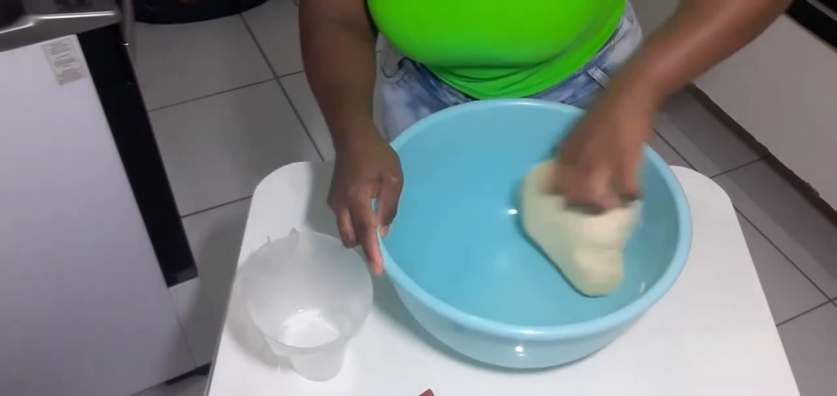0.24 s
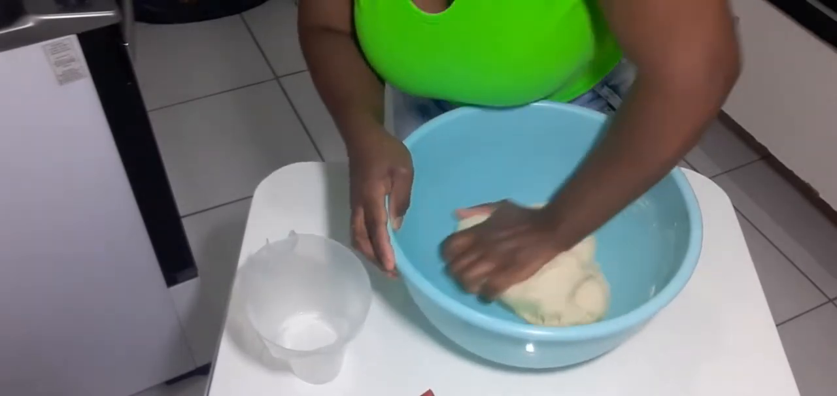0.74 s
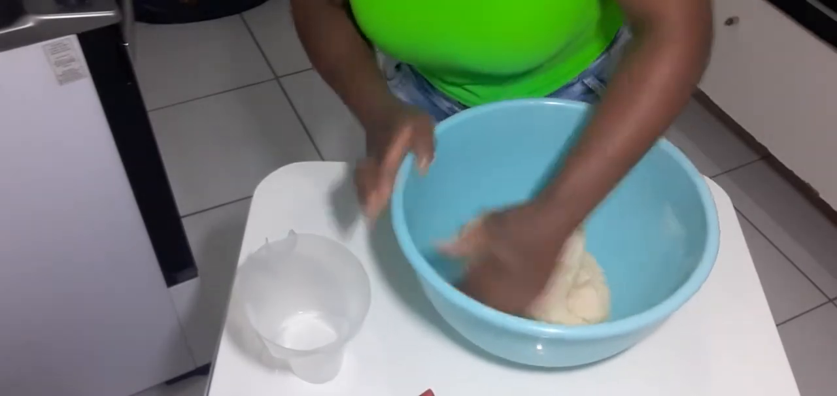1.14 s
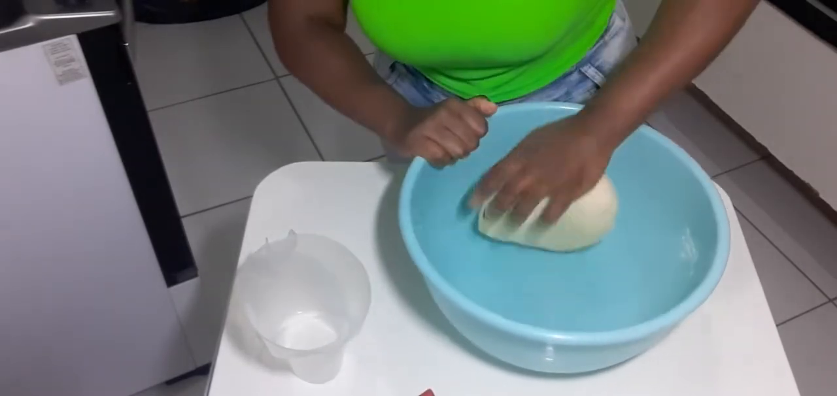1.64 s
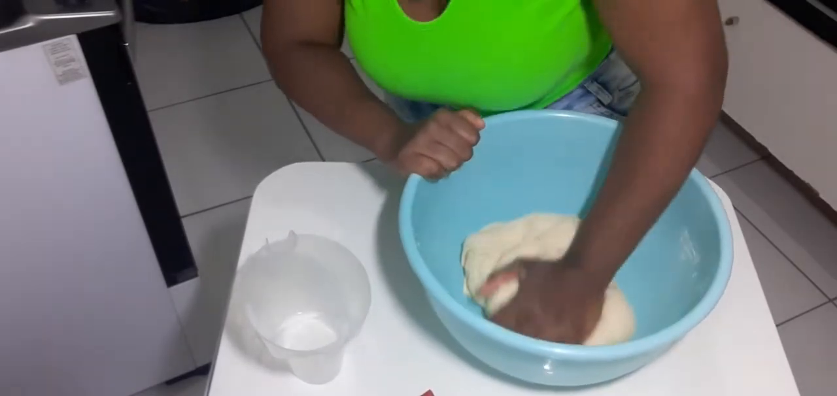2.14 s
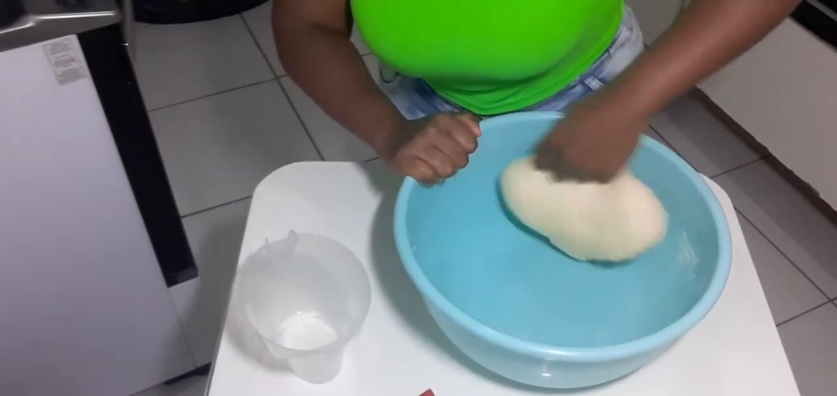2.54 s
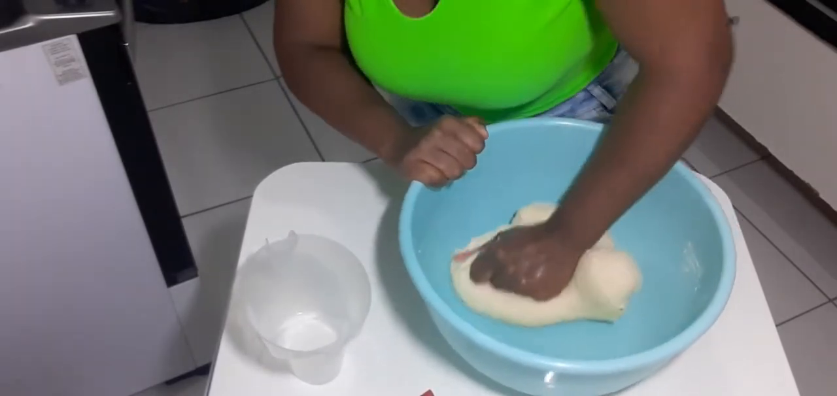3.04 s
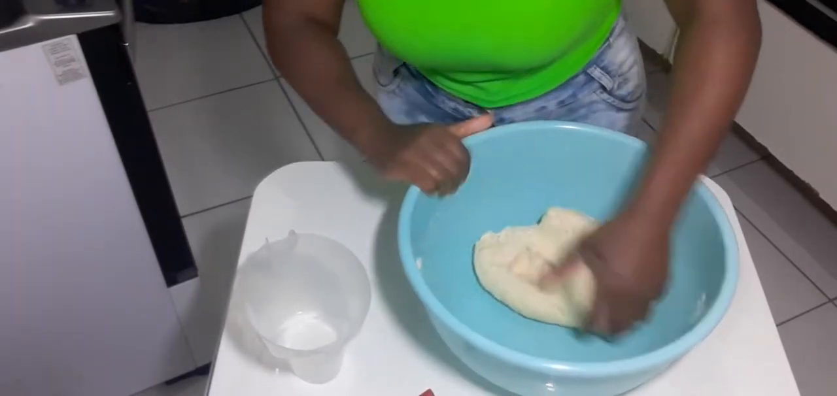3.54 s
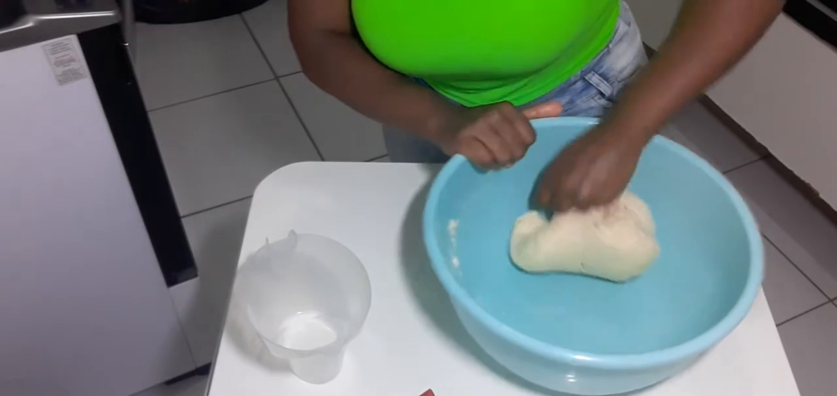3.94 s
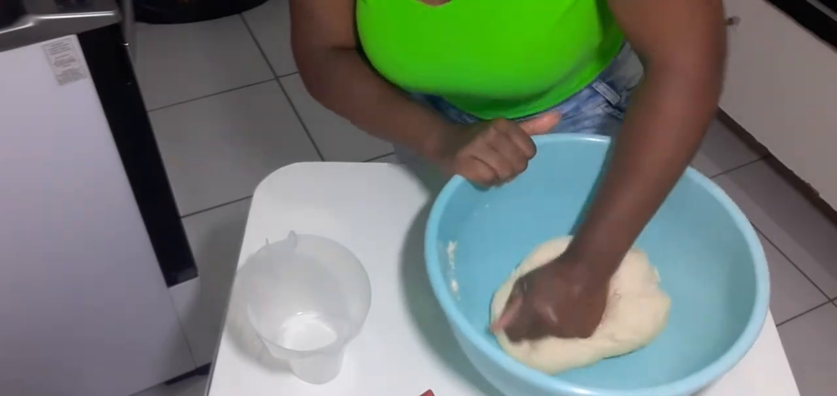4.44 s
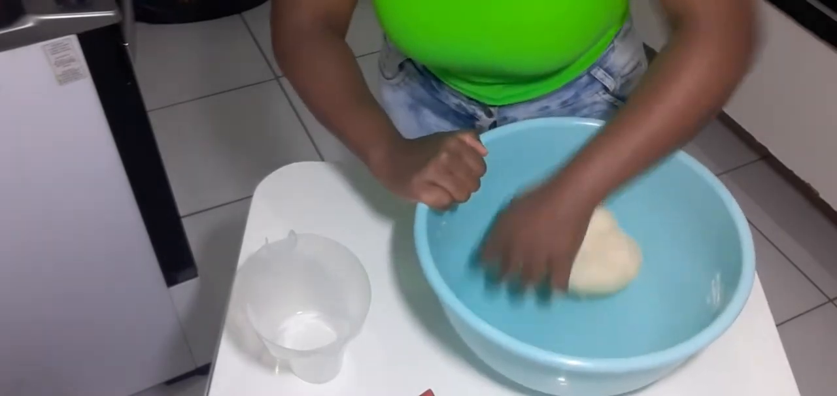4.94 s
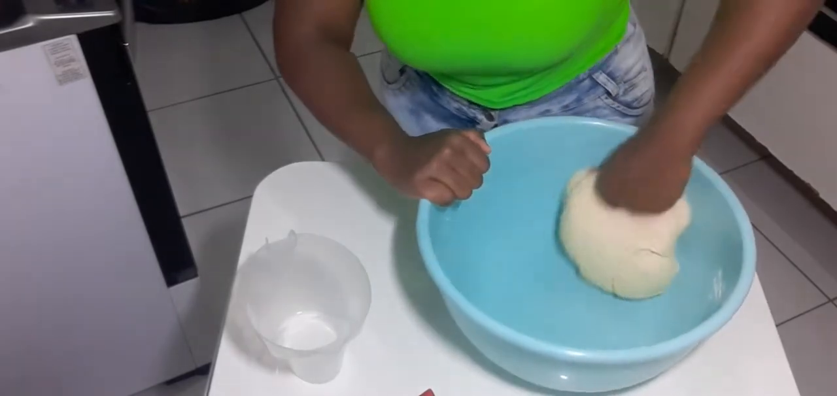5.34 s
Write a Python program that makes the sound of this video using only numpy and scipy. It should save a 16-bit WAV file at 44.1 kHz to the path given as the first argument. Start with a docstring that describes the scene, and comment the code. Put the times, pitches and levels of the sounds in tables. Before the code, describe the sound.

Dough is kneaded by hand in a plastic bowl on a table, heard fairly close and slightly right of centre in a small, hard-walled kitchen. It starts with a soft pat and two quick low scuffs, then lighter pats and faint rubbing until about 1 second. Pats cluster at 1.2, and a strong dragging push leads to the loudest hollow thud with a plastic clack at 1.4. Quiet handling follows; a firm rub swells at 2.2 to 2.4, then fades into very soft touches. Knocks return at 3.3, 3.5 and 3.6, with short scuffs around them. Light pats continue around 3.9 to 4.3. A dull weighty knock lands at 4.65, followed by a tight double hit with a clack at 4.8. Soft pats and weak rubbing finish, the last pat near 5.55. Bowl and table ring briefly; reflections fade within half a second over a barely audible steady hush.

```python
"""Soft scuffs and pats, a few hard knocks and a faint steady hush: dough is kneaded in a plastic bowl.
The rubbing is noise and tiny random slips, swelling with each stroke of the hand.
Pats and knocks add a dying thud, short noise bursts and the ringing of bowl and table.
Hard pushes tip the bowl, which knocks back on the table.
Fading stereo noise gives the reflections of the small tiled kitchen."""
import sys
import numpy as np
from scipy import signal
from scipy.fft import rfft, irfft, next_fast_len
from scipy.io import wavfile
from scipy.ndimage import map_coordinates

SR = 44100
rng = np.random.default_rng(int(sys.argv[2]) if len(sys.argv) > 2 else 0)


def to_wav(sig):
    """Store sig (one row per channel, or 1-D mono) as 16-bit WAV at the path in sys.argv[1].

    Samples outside -1..1 are clipped; the rate is SR.
    """
    pcm = np.clip(np.atleast_2d(sig), -1, 1) * 32767
    pcm = np.round(pcm).astype(np.int16)
    wavfile.write(sys.argv[1], SR, pcm.T)  # frames by channels


N = 246049
TAIL = SR * 3 // 4  # samples kept of each blow, ringing and reflection: 0.75 s

# colour of the sharp crack of hard plastic: (frequency [Hz], level per Hz [dB])
CRACK_COLOUR = [(1000, 2), (2500, -2), (4000, -2), (5500, -3.5), (7500, -10.5), (9400, -10.5), (10200, -16),
                (16000, -22.5)]


def amp(db):
    """Turn decibels into a gain."""
    return 10 ** (np.asarray(db) / 20)


def unit(x):
    """Scale a sound to an rms (average strength) of 1."""
    return x / np.sqrt(np.mean(x ** 2) + 1e-20)


def along(points, hz):
    """Read a curve of (frequency, value) points, with straight lines on a log frequency axis."""
    point_hz, value = np.transpose(points)
    return np.interp(np.log(hz + 1), np.log(point_hz + 1), value)


def filtered(x, response):
    """Multiply the spectrum of x by a response that depends on frequency."""
    n = x.shape[-1]
    padded = next_fast_len(n + 8192)
    hz = np.fft.rfftfreq(padded, 1 / SR)
    return irfft(rfft(x, padded) * response(hz), padded)[..., :n]


def convolved(x, kernel):
    """Let every sample of x set off a copy of the kernel; keep the length of x."""
    x = np.atleast_2d(x)
    return signal.fftconvolve(x, np.atleast_2d(kernel), axes=1)[:, :x.shape[-1]]


def coloured(x, spectrum, size=4096):
    """Give x a spectrum with a unit-energy filter that answers at once and never beforehand."""
    # folding the cepstrum (the spectrum of the log spectrum) makes the filter minimum phase
    cepstrum = irfft(np.log(amp(along(spectrum, np.fft.rfftfreq(size, 1 / SR)))))
    cepstrum[1:size // 2] *= 2
    cepstrum[size // 2 + 1:] = 0
    kernel = irfft(np.exp(rfft(cepstrum)))
    return convolved(x, kernel / np.linalg.norm(kernel))


def wobble(rate):
    """Draw a smooth random curve with `rate` random points a second."""
    points = rng.standard_normal(int(N * rate / SR) + 4)
    return map_coordinates(points, [np.arange(N) * rate / SR])


def pan(left_minus_right_db):
    """Give the left and right gains for a level difference shared evenly between them."""
    return amp(left_minus_right_db * np.array([[.5], [-.5]]))


def add(out, s, sound):
    """Mix a sound into out, starting at s seconds."""
    start = max(round(s * SR), 0)
    out[:, start:start + sound.shape[1]] += sound[:, :N - start]


def diffuse(n):
    """Noise from all sides: much alike left and right in the bass, hardly related in the treble."""
    # left-right likeness of sound from all around: (frequency [Hz], correlation [-1 to 1])
    likeness = [(100, 0.76), (280, 0.75), (500, 0.5), (1000, -0.022), (3000, -0.16), (12000, -0.24)]

    def mid_and_side(hz):
        turn = np.arccos(np.clip(along(likeness, hz), -1, 1)) / 2
        return np.array([np.cos(turn), np.sin(turn)])

    mid, side = filtered(rng.standard_normal((2, n)), mid_and_side)
    return np.array([mid + side, mid - side])


def room_tone():
    """The still kitchen is a faint steady hush of noise from all sides."""
    # colour of the still room: (frequency [Hz], level per Hz [dB])
    hush_colour = [(25, -29), (60, -6.5), (180, -6), (330, 1), (620, -9), (1600, -9.5), (3200, -25),
                   (6000, -23), (9300, -19), (15500, -24.5)]
    hush = filtered(diffuse(N), lambda hz: amp(along(hush_colour, hz)))
    return amp(-67.5) * unit(hush)


def reflections(gap):
    """Tiled walls return a dense fading tail, of unit energy, that builds up over `gap` seconds."""
    # how long the kitchen rings: (frequency [Hz], time to fade by 60 dB [s])
    fade_times = [(100, 0.46), (300, 0.54), (1500, 0.45), (4000, 0.47), (8000, 0.42), (15000, 0.45)]
    hz, t, bands = signal.stft(diffuse(TAIL), SR, nperseg=256)
    fade = amp(-60 * t / along(fade_times, hz)[:, None])
    tail = signal.istft(bands * fade, SR, nperseg=256)[1][:, :TAIL]
    tail = tail * (1 - np.exp(-np.arange(tail.shape[1]) / SR / gap))
    return tail / np.linalg.norm(tail[0])


def kitchen(x, wet_db):
    """The room adds reflections to the direct sound; the joint response is scaled to unit energy."""
    answer = amp(wet_db) * reflections(gap=0.00097)
    answer[:, 0] += 1  # the direct sound
    return convolved(x, answer / np.linalg.norm(answer[0]))


def ring(t, pitch_hz, reach_db):
    """Bowl and table ring in many modes, weaker the more octaves they lie from the given pitch."""
    # bowl and table ringing together: (frequency [Hz], level [dB], time to fade by 60 dB [s]);
    # each ringing shifts the frequencies and levels a little
    bowl_modes = [(126, -24, 0.34), (243.4, -3.5, 0.48), (252, -1.5, 0.46), (295.8, -4, 0.54),
                  (317.8, -13, 0.95), (343.9, -2, 0.36), (364, -5.5, 0.54), (395.4, -17.5, 0.73),
                  (446.4, -1.5, 0.34), (472.4, -7, 0.45), (587, -10.5, 0.73), (712, -3, 0.33),
                  (826, -2, 0.27), (1158, -7.5, 0.1), (1500, -12.5, .3), (1620, -10, 0.48),
                  (1672, -7.5, 0.42), (1910, -13, 0.26), (2315, -14, 0.53)]
    load_detune = 0.01185  # the dough lies differently each time: typical share of shift per mode
    hz, db, t60 = np.transpose(bowl_modes)[:, :, None]
    hz = hz * (1 + load_detune * rng.standard_normal(hz.shape))
    octaves = np.log2(hz / pitch_hz)
    level = db - reach_db * octaves ** 2 + 0.82 * rng.standard_normal(hz.shape)
    modes = amp(level - 60 * t / t60) * np.sin(2 * np.pi * hz * t)
    return modes.sum(axis=0) * (1 - np.exp(-t / 0.0032))


def pressure():
    """Each stroke presses harder, then eases off; gives the drag, scuff and skin levels in dB."""
    # the hand pushing, folding and pulling the dough, levels before each layer's own gain:
    # (start [s], rise [s], fall [s], scuff [dB], drag over scuff [dB], skin hiss over scuff [dB])
    hand_strokes = [(-0.02, 0.015, 0.08, -47.5, 8, -11), (0.054, 0.017, 0.094, -46, 3, -10.5),
                    (0.267, 0.0033, 0.067, -57, 11, -7), (0.32, 0.047, 0.12, -58, 7, -4),
                    (0.409, 0.064, 0.21, -59, 7, -11.5), (0.737, 0.0065, 0.46, -62, 2, -9),
                    (0.964, 0.028, 0.11, -52.5, -3.5, -10.5), (1.211, 0.017, 0.16, -55.5, 11, -4.5),
                    (1.338, 0.05, 0.032, -39.5, 10, -20), (1.775, .04, 0.12, -63, 9.5, -9.5),
                    (1.88, 0.12, .95, -73.5, -2.5, 0.5), (2.198, .14, 0.084, -44.5, 5, -16.5),
                    (2.689, 0.039, 0.29, -66.5, 9, -1), (3.13, 0.067, 0.043, -67.5, 16.5, -1),
                    (3.175, 0.019, 0.11, -51, -12, -12.5), (3.478, 0.0084, 0.2, -56.5, 2, -10),
                    (3.59, 0.044, 0.24, -52.5, 7, -5.5), (4.1, 0.24, 0.095, -66.5, 12, -8),
                    (4.32, 0.11, 0.19, -66.5, -9, -4.5), (4.498, 0.0089, 0.16, -51, 0.5, -13),
                    (4.78, .12, 0.14, -51, -15, -11.5), (5.04, 0.094, 0.23, -59.5, 11, -12),
                    (5.29, 0.036, 0.43, -66.5, 4, -3)]
    curve = 0.89  # under 1 the pressure comes early and stays; over 1 it peaks briefly
    t = np.arange(N) / SR
    power = np.zeros((3, N))
    for s, rise, fall, scuff_db, drag_db, skin_db in hand_strokes:
        swell = np.interp(t, [s, s + rise, s + rise + fall], [0, 1, 0]) ** curve
        peak = amp(scuff_db + np.array([drag_db, 0, skin_db]))
        power += np.outer(peak, swell) ** 2
    return 10 * np.log10(power + 1e-20)


def slips(rate, spread_db, smooth):
    """Sliding dough sticks and lets go: about `rate` uneven clicks a second over smooth noise."""
    size = np.sign(rng.standard_normal(N)) * amp(2 * spread_db * rng.random(N))
    clicks = unit((rng.random(N) < rate / SR) * size)
    return unit(clicks + smooth * rng.standard_normal(N))


def through_bowl(x, pitch_hz, reach_db, ring_db):
    """Friction keeps the bowl's modes near one pitch humming along with it."""
    modes = ring(np.arange(TAIL) / SR, pitch_hz, reach_db)
    return x + amp(ring_db) * convolved(x, modes / np.linalg.norm(modes))


def rubbing():
    """Dragged dough shudders the bowl, scuffs its wall and hisses under the palm."""
    # colours of the four kinds of rubbing: (frequency [Hz], level per Hz [dB])
    drag_colour = [(25, -48), (55, -6), (85, -22), (115, -3), (150, -16), (210, -11), (290, 3.5), (360, -1),
                   (480, -2), (650, -19.5), (1500, -38)]
    scuff_colour = [(250, -9.5), (550, -5), (820, 2.5), (1060, -8), (1300, -2), (1680, -4.5), (2050, -5.5),
                    (2500, -6), (3200, -10), (5000, -12), (8000, -17.5), (16000, -51)]
    squeeze_colour = [(400, -8), (700, -5), (1150, -3.5), (1500, -6.5), (3000, -22.5)]
    skin_colour = [(1000, 0), (3000, -6), (5000, -1), (7500, -3.5), (9300, 2), (10300, -2), (13000, 0.5),
                   (16000, -4.5)]
    drag_db, scuff_db, skin_db = pressure()
    grip = wobble(45)  # the dough catches and lets go

    drag = coloured(slips(rate=180, spread_db=8.5, smooth=0.49), drag_colour)
    drag = amp(drag_db - 8.0 + 2 * grip) * drag
    drag = through_bowl(drag, pitch_hz=313, reach_db=14, ring_db=-24.5)

    scuff = coloured(slips(rate=320, spread_db=3.0, smooth=1.0), scuff_colour)
    scuff = amp(scuff_db - 5.5 + 3.5 * grip) * scuff
    scuff = through_bowl(scuff, pitch_hz=1700, reach_db=9.5, ring_db=-22)

    # squeezing grows faster than the scuff, so it matters mostly in firm strokes
    squeeze = coloured(slips(rate=230, spread_db=17.5, smooth=0.96), squeeze_colour)
    squeeze = amp(1.545 * scuff_db + 19 + 2 * grip) * squeeze

    skin = coloured(slips(rate=2000, spread_db=-0.5, smooth=0.88), skin_colour)
    skin = amp(skin_db + 3.5 + 1.1 * grip) * skin
    return kitchen(drag + scuff + squeeze, wet_db=0.5) + kitchen(skin, wet_db=4)


def smack(t, t60, wet_db, snap_db, rise=0.00077):
    """Contact is one snap and a short noisy chatter that melts into the room, of unit energy."""
    snap = amp(snap_db) * (t == 0)
    chatter = rng.standard_normal(len(t)) * amp(-60 * t / t60) * (1 - np.exp(-t / rise))
    pair = snap + chatter / np.linalg.norm(chatter) + amp(wet_db) * reflections(gap=0.0014)
    return pair / np.linalg.norm(pair[0])


def blow(thump_db, weight_db, clack_db, crack_db, thud_hz, clack_hz):
    """One blow is a soft thud, the weight behind it, and the clack and crack of hard plastic."""
    # colour of the dull push: (frequency [Hz], level per Hz [dB])
    push_colour = [(25, -64), (50, -31.5), (78, -12), (100, -13.5), (125, 1), (160, -7.5), (205, -4),
                   (260, -1.5), (340, 0), (480, 3), (650, -9.5), (1000, -20), (2500, -48.5)]
    # colour of the plastic wall's clack: (multiple of its pitch [ratio], level per Hz [dB])
    clack_shape = [(.2, -32.5), (.45, -3.5), (.65, -7.5), (1, -0.5), (1.3, -3.5), (1.8, -10.5), (3, -18.5),
                   (8, -45.5)]
    t = np.arange(TAIL) / SR

    # the dough soon damps the bowl's floor; bowl and table ring on
    flex = np.sin(2 * np.pi * thud_hz * t) * amp(-60 * t / 0.04) * (1 - np.exp(-t / 0.00091))
    thump = amp(17.5) * kitchen(flex / np.linalg.norm(flex), wet_db=4.0)
    thump += amp(-12.5) * ring(t, thud_hz, reach_db=19.5)

    # the weight of arm and dough lands as one dull push
    weight = amp(17.0) * coloured(kitchen(1. * (t == 0), wet_db=17.5), push_colour)

    # the clack is higher where the wall is stiff, lower where dough loads it
    wall_colour = np.multiply(clack_shape, [clack_hz, 1])
    clack = amp(25.5) * coloured(smack(t, t60=0.0091, wet_db=7.5, snap_db=-14.0), wall_colour)
    clack += amp(-9.5) * ring(t, clack_hz, reach_db=4)

    crack = amp(28) * coloured(smack(t, t60=0.0093, wet_db=15.5, snap_db=0.0), CRACK_COLOUR)
    soft = amp(thump_db) * thump + amp(weight_db) * weight
    return soft + amp(clack_db) * clack + amp(crack_db) * crack


def pats():
    """Dough and fingers pat the bowl with one shared thud pitch; firmer clacks crack far more."""
    # pats on the bowl: (time [s], force [dB], clack over force [dB], clack pitch [Hz])
    soft_contacts = [(0.002, -34.5, -12, 1660), (0.274, -40, -14.5, 1100), (0.602, -45, -14, 1490),
                     (0.745, -66, 12.5, 1590), (1.215, -38, -11.5, 1600), (1.223, -37.5, -6, 1630),
                     (1.267, -36, -12, 1620), (1.868, -44.5, -13.5, 1250), (2.2, -45.5, -9, 930),
                     (2.228, -39.5, -15.5, 910), (2.908, -47.5, -14, 1500), (2.977, -59.5, -2.5, 1530),
                     (3.133, -52.5, -12, 800), (3.547, -49, 3, 1520), (3.866, -44.5, -4, 1110),
                     (4.006, -45.5, -1.5, 970), (4.202, -47, -12.5, 950), (4.252, -45.5, -10.5, 1380),
                     (4.779, -31.5, -6.5, 1570), (5.086, -42, -19, 935), (5.2, -42.5, -10, 960),
                     (5.561, -42, -10, 1200)]
    thud_hz, weight_over_force_db = 338, -4  # every pat flexes the same spot of the bowl's floor
    firm_clack_db, firm_crack_db = -44, -56  # a firm pat's clack and the crack that goes with it
    crack_growth = 1.7  # dB of crack per dB of clack
    out = np.zeros((2, N))
    for s, force_db, wall_db, clack_hz in soft_contacts:
        clack_db = force_db + wall_db
        crack_db = firm_crack_db + crack_growth * (clack_db - firm_clack_db)
        pat = blow(force_db, force_db + weight_over_force_db, clack_db, crack_db, thud_hz, clack_hz)
        add(out, s, pat)
    return out


def knocks():
    """Hard pushes tip the bowl; its edge grazes the table just before it falls back on it."""
    # the tipped bowl landing on the table: (time [s], force [dB], thump over force [dB],
    # clack over force [dB], crack over force [dB], thud pitch [Hz], clack pitch [Hz])
    landings = [(1.389, -13, 3.5, -14, -17.5, 360, 1150), (1.441, -29.5, 10, -4, -49, 398, 930),
                (3.312, -23, -0.5, -14, -12.5, 482, 1060), (3.481, -26.5, -1, -12, -27, 360, 1510),
                (3.604, -20, 3, -15.5, -20, 371, 1660), (4.659, -15, -12, -12.5, -19.5, 405, 800),
                (4.791, -23, -3.5, -11.5, -22, 330, 790), (4.798, -28.5, -19, -3.5, -10.5, 364, 1040)]
    lead_s, graze_over_crack_db = .004, -10.5  # how early the graze comes, and its level
    out = np.zeros((2, N))
    t = np.arange(TAIL) / SR
    for s, force_db, thump_db, clack_db, crack_db, thud_hz, clack_hz in landings:
        landing = blow(force_db + thump_db, force_db, force_db + clack_db, force_db + crack_db,
                       thud_hz, clack_hz)
        add(out, s, landing)
        graze = amp(25.5) * coloured(smack(t, t60=0.013, wet_db=10, snap_db=9), CRACK_COLOUR)
        add(out, s - lead_s, amp(force_db + crack_db + graze_over_crack_db) * graze)
    return out


def scene():
    """The bowl is heard mostly a little to the right, the dough in it a little more so."""
    # sideways lean of the whole sound: (frequency [Hz], left minus right [dB])
    lean = [(50, -2), (125, -4.5), (250, -4.5), (1000, -3.5), (2000, -4.5), (4000, -2), (8000, -2.7),
            (12000, 1.5)]
    # the dough's own left minus right in dB, on top of the lean
    dough = pats() * pan(-2) + rubbing() * pan(-1.55)
    together = knocks() + dough + room_tone()
    return filtered(together, lambda hz: amp(np.outer([.5, -.5], along(lean, hz))))


def record(dry):
    """The microphone loses the deepest bass, and the recorder keeps nothing above its band limit."""
    half_hz, top_hz = 34, 15800  # the bass is halved at half_hz
    return filtered(dry, lambda hz: hz ** 3 / (hz ** 3 + half_hz ** 3) * (hz < top_hz))


dry = scene()
out = record(dry)
to_wav(out)
```